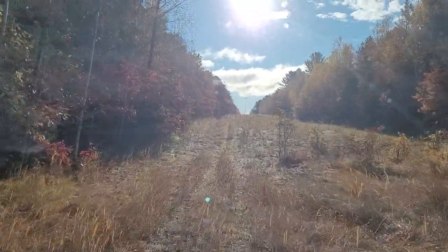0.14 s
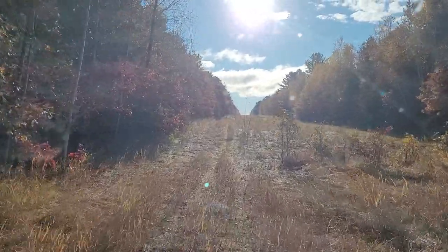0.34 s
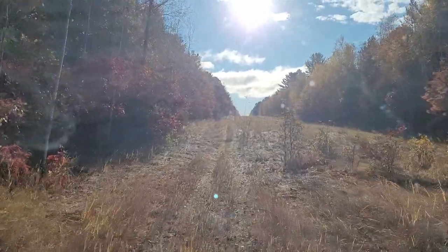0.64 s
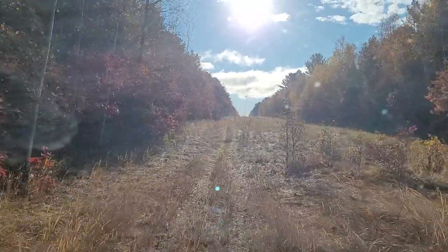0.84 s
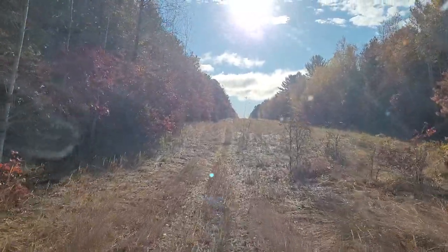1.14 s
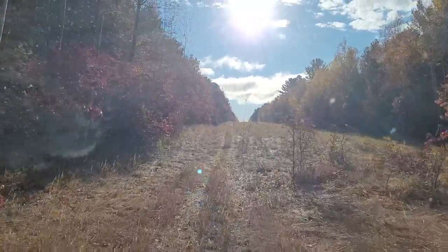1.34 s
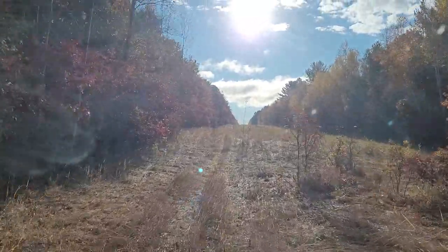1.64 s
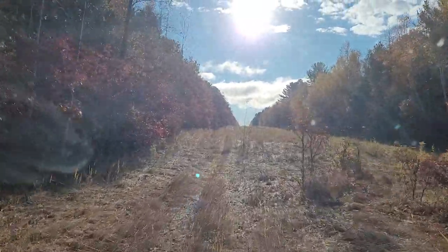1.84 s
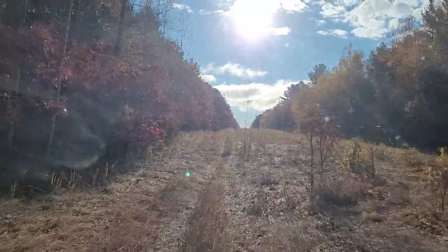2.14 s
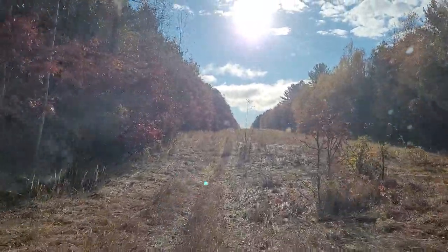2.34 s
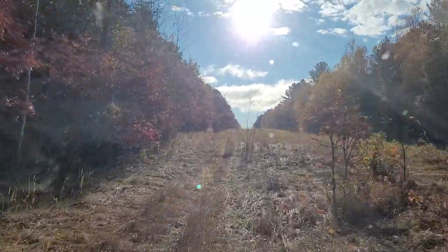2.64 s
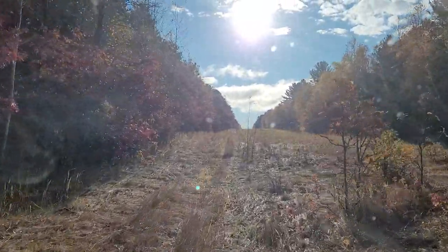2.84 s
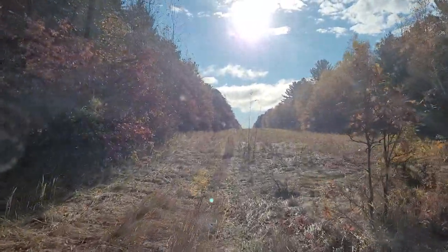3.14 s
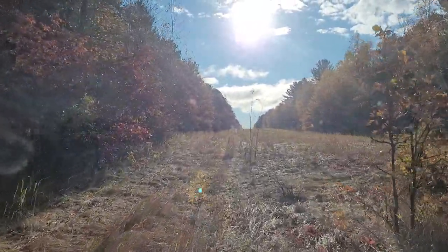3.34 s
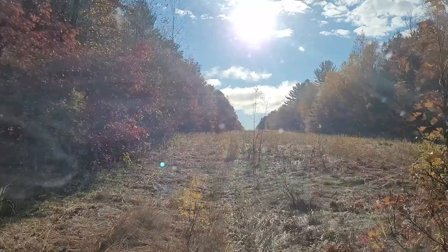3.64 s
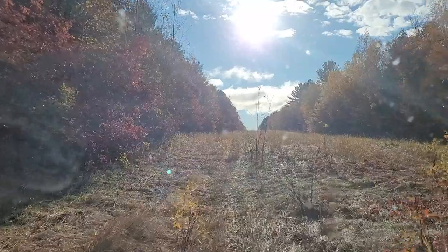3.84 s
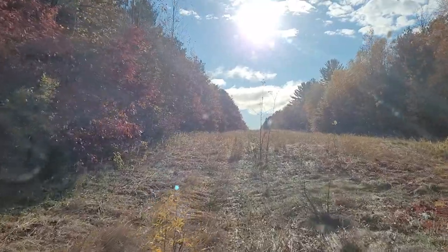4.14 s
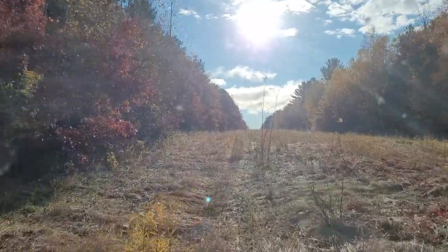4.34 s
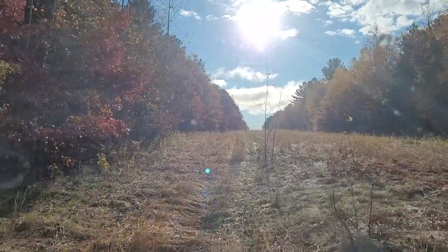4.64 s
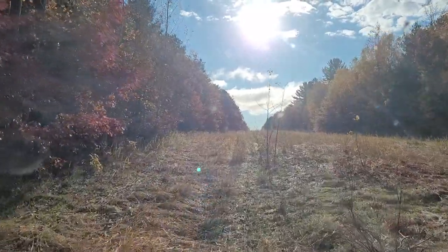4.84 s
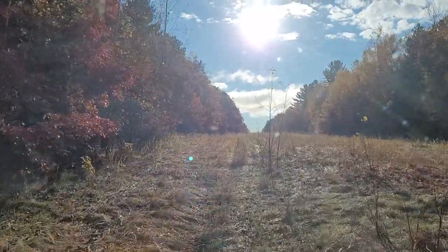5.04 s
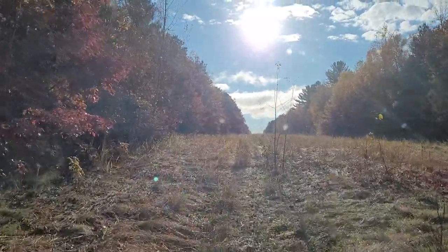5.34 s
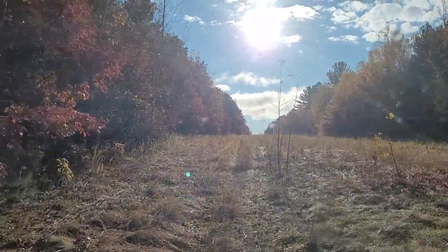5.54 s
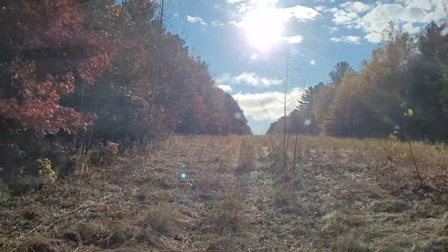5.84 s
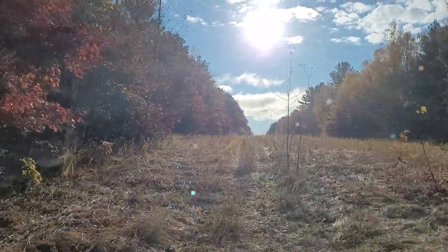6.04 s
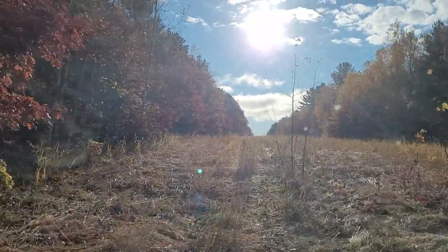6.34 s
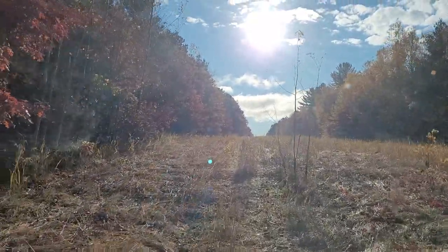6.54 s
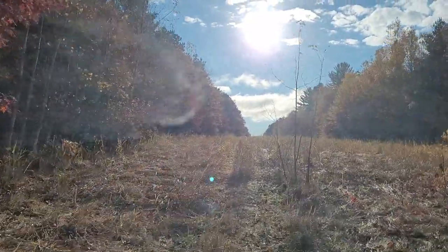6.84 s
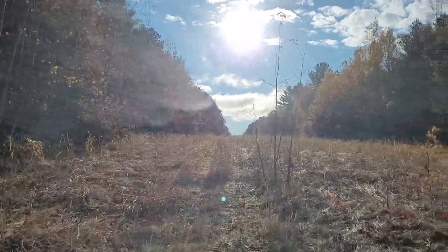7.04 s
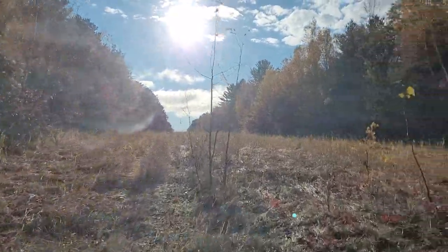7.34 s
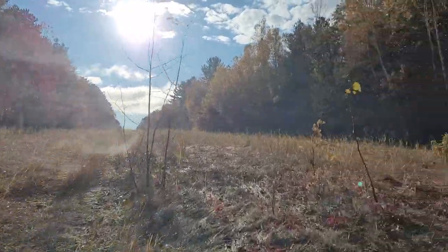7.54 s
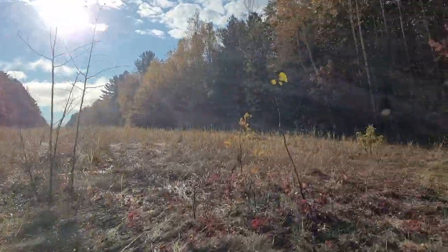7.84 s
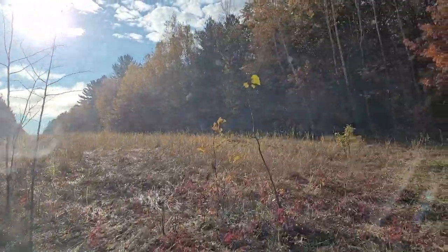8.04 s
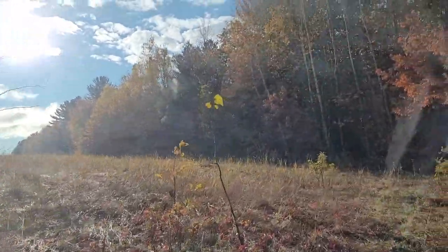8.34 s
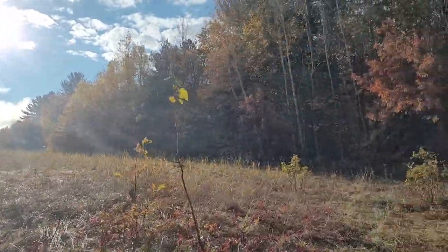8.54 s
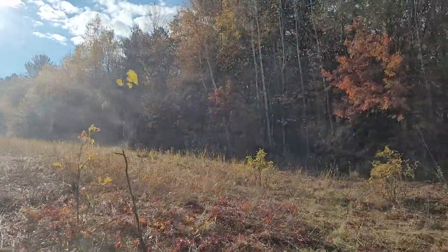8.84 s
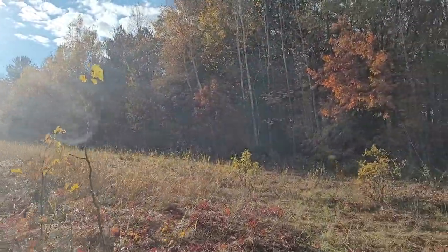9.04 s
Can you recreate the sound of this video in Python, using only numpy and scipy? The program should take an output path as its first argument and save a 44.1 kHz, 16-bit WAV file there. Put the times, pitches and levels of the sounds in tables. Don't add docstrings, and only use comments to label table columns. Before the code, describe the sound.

Low throbbing engine drone with tyre hum over tussocks, a sagging pitch near seven seconds, twig knocks, panel buzz and a renewed raspy pull.

```python
import sys
import numpy as np
from scipy import signal
from scipy.fft import rfft, irfft, next_fast_len
from scipy.io import wavfile
from scipy.ndimage import uniform_filter1d

SR = 44100
rng = np.random.default_rng(int(sys.argv[2]) if len(sys.argv) > 2 else 0)


def dump_mix(stems):
    frames = np.atleast_2d(stems).T
    limited = np.clip(frames, -1, 1)
    pcm = np.round(limited * 32767).astype(np.int16)
    wavfile.write(sys.argv[1], SR, pcm)


def rack_gain(trim_db):
    fader = np.asarray(trim_db, float)
    return 10 ** (fader / 20)


N = 405719


def curves(table):
    s, *columns = np.transpose(table)
    return [np.interp(np.arange(N) / SR, s, column) for column in columns]


def at(table, hz):
    table_hz, value = np.transpose(table)
    return np.interp(np.log(hz + 1), np.log(table_hz + 1), value)


def unit(x):
    return x / np.sqrt(np.mean(x ** 2))


def walk(rate):
    levels = np.resize(rng.standard_normal(400), int(N * rate / SR) + 2)
    glide = np.interp(np.arange(0, len(levels), .125), np.arange(len(levels)), levels)
    glide = uniform_filter1d(glide, size=5)
    return 1.3 * np.interp(np.arange(N) * (8 * rate / SR), np.arange(len(glide)), glide)


def swells(rows, width_s):
    t = np.arange(N) / SR
    return sum(db * np.exp(-((t - s) / width_s) ** 2) for s, db in rows)


def ring(x, hz, width_hz):
    return signal.lfilter(*signal.iirpeak(hz, hz / width_hz, SR), x)


# (time [s], cycle rate [Hz], throttle against cruising [dB])
ENGINE_RUN = [(0, 31.73, 0.5), (1.8, 31.58, 0.5), (3.3, 31.45, 2.5), (3.7, 30.42, -7), (4.7, 29.94, -4.5),
              (5.3, 29.29, -8.5), (6.76, 28.56, -5), (7.0, 26.25, -18.5), (7.25, 25.1, -20),
              (7.5, 24.43, -13.5), (7.78, 26.08, -6.5), (8.12, 24.0, -8.5), (8.3, 25.45, 0),
              (8.5, 27.88, 1.5), (8.8, 27.55, 4.5), (8.97, 25.59, -7.5), (9.1, 27.2, 4), (9.2, 28.06, 1)]
# (time [s], second firing against the first [dB], left minus right [dB])
FIRING_LOAD = [(0, -24, -1.7), (4, -22, -1.2), (6.8, -12, -1.1), (8.2, -8, -.5), (8.45, -3, -.6),
               (9.2, -4, -.9)]


def engine():
    hz, throttle_db = curves(ENGINE_RUN)
    hz = uniform_filter1d(hz, size=3000) + 0.053 * walk(5.)
    second_db, pan_db = curves(FIRING_LOAD)
    turns = np.cumsum(hz) / SR
    low = crank_boom(hz, turns, throttle_db, pan_db)
    rasp = exhaust(hz, turns, throttle_db, second_db)
    return low + rasp + intake_howl(hz, turns, throttle_db, second_db) + gear_whine(turns)


# (frequency [Hz], level [dB])
CAB_LOW_ORDERS = [(48, -18.5), (56, -16), (63, -25.5), (73, -17.5), (83, -26.5), (95, -31)]
# (frequency [Hz], level [dB])
CAB_FOURTH_ORDER = [(97, -17.5), (110, -16), (117, -17.5), (127, -21)]
# (time [s], gain [dB])
MOUNT_RUTS = [(.45, 6.5), (1.15, 0), (1.4, 1), (1.75, -5), (2.15, 6), (2.6, 0), (4.3, 6.5), (5.4, -4),
              (7.33, -6), (8.3, 0.5), (8.97, 5.5), (9.19, 2), (6.3, 2), (5.95, -7)]


def crank_boom(hz, turns, throttle_db, pan_db):
    def order_db(cab, order, wander):
        return at(cab, order * hz) + 0.2 * throttle_db + wander * 0.34 * walk(4.)

    crank_db = order_db(CAB_LOW_ORDERS, 2., 1.2) + swells(MOUNT_RUTS, 0.072) + 1.3 * walk(12.)
    third_db = order_db(CAB_LOW_ORDERS, 3., 1.1)
    fourth_db = order_db(CAB_FOURTH_ORDER, 4., .6) + 1.27 * walk(15.)
    boom_hz, boom_width_hz = 57, 3
    lag = 1.1 + np.arctan((2 * hz - boom_hz) / boom_width_hz)
    boom = rack_gain(crank_db) * np.cos(4 * np.pi * turns - lag)
    boom -= rack_gain(third_db) * (np.cos(6 * np.pi * turns) + rack_gain(-11.5) * np.cos(10 * np.pi * turns))
    boom += rack_gain(fourth_db) * np.cos(8 * np.pi * turns)
    boom *= np.sqrt(2)
    late = np.interp(np.arange(N) - 10, np.arange(N), boom)
    return np.array([late * rack_gain(pan_db / 2), boom * rack_gain(-pan_db / 2)])


# (frequency [Hz], width [Hz], one order at the centre [dB],
# share heard across the cab [-1 to 1], share of the load it follows [ratio])
EXHAUST_PIPES = [(160, 90, -42, -.1, .1), (262, 70, -40.5, -.2, .6), (335, 40, -49, .9, .3),
                 (410, 30, -43.5, -.3, .7), (443, 14, -50, -.3, 2), (472, 28, -43, -.3, .7),
                 (550, 70, -62, .5, .4)]


def exhaust(hz, turns, throttle_db, second_db):
    firing = np.flatnonzero(np.diff(np.floor(2 * turns)))
    pulses = np.zeros(N)
    pulses[firing] = rack_gain(.8 * rng.standard_normal(len(firing)))
    pulses[firing[1::2]] *= rack_gain(second_db[firing[1::2]])
    gas = .008 * np.exp(-(2 * turns % 1) / .4) * rng.standard_normal(N)
    drive = smear(pulses + gas) * SR / hz / np.sqrt(2)
    load_db = -37 + throttle_db + 0.64 * walk(5.) + 37.5
    rasp = 0
    for k, (f, width, db, across, follow) in enumerate(EXHAUST_PIPES):
        tone = ring(ring(drive, f, width), f, width)
        tone = (-1) ** k * rack_gain(db + follow * load_db) * tone
        rasp = rasp + tone * (1 + across * np.array([[1], [-1]]))
    return rasp


def smear(x):
    size = next_fast_len(N)
    hz = np.fft.rfftfreq(size, 1 / SR)
    phase = 2.4 * np.cos(2 * np.pi * hz / 150) + 1.5 * np.cos(2 * np.pi * hz / 83)
    return irfft(rfft(x, size) * np.exp(1j * phase), size)[:N]


def intake_howl(hz, turns, throttle_db, second_db):
    box_hz, box_width_hz, pulled_order = 712.4, 23, 25.1
    pull = np.clip(1.5 * rack_gain(2 * second_db), 0, 1)
    centre_hz = box_hz + pull * (pulled_order * hz - box_hz)
    level_db = -36.5 + 0.73 * throttle_db - 0.53 * (hz - 27.3) ** 2
    howl = 0
    for order in range(21, 32):
        inside = 1 / (1 + ((order * hz - centre_hz) / box_width_hz) ** 2)
        howl = howl + inside * np.cos(2 * np.pi * order * turns + .52 * order ** 2)
    return howl * rack_gain(level_db + 0.92 * walk(30.) + 1.2 * walk(15.)) * np.array([[.85], [1.15]])


# (time [s], half length [s], level [dB])
OVERRUN_WHINES = [
    (6.45, .4, -53),
    (7.95, .22, -50),
]


def gear_whine(turns):
    t = np.arange(N) / SR
    level = sum(rack_gain(db) * np.exp(-((t - s) / half_s) ** 2) for s, half_s, db in OVERRUN_WHINES)
    return level * rack_gain(1.5 * walk(25.)) * np.cos(2 * np.pi * 38 * turns)


# (time [s], tyre lug rate [Hz], ground roughness [dB])
TRAIL = [(0, 39.14, 1), (1, 38.5, 4), (3.1, 39.1, 1), (4.5, 37.45, 1), (5.4, 36, -1), (6.2, 31.93, -6.5),
         (6.6, 31.75, 2), (7.1, 36.7, -18), (9.2, 36.8, -13.5)]
# (time [s], hum gain [dB])
TUSSOCK_HITS = [
    (.55, 8),
    (1.05, 3),
    (1.75, 7),
    (2.7, 7),
    (3.42, 10.5),
    (4.2, 7.5),
    (4.9, 6),
    (6.0, 9.5),
]


def tread():
    hz, rough_db = curves(TRAIL)
    hum_db = -28.5 + rough_db + swells(TUSSOCK_HITS, 0.31)
    phase = 2 * np.pi * np.cumsum(hz + 0.56 * walk(3.8)) / SR
    hum = rack_gain(hum_db + 3.0 * walk(9.)) * (np.cos(phase) + rack_gain(-15.0) * np.cos(2 * phase))
    return np.sqrt(2) * np.array([np.roll(hum, 25), rack_gain(3.0) * hum])


# (time [s], swish peak level [dB], snap level [dB], knock level [dB])
STALK_TICKS = [(1.6322, -37, -53, -40), (2.0443, -39, -51, -40), (2.2079, -46, -49, -42),
               (3.049, -46, -39, -40), (3.714, -34, -51, -28), (5.246, -24, -31, -40),
               (5.365, -41, -47, -29), (5.507, -49, -51, -37), (8.1308, -45, -37, -46),
               (8.8808, -40, -28, -23)]
STALK_WHIPS = [(0.3444, -45, -56, -39), (1.3832, -42, -38, -28.5), (1.4024, -51, -43, -41),
               (4.8695, -41, -38, -30.5), (4.9398, -60, -60, -26), (5.244, -37, -32.5, -34),
               (6.075, -32.5, -35, -37), (6.6054, -63, -60, -30.5), (6.6344, -49, -41, -36),
               (7.417, -47, -36, -34), (7.44, -38, -40, -40), (7.4654, -57, -28.5, -29),
               (7.4894, -39, -55, -38), (7.9394, -51, -42, -41), (8.9219, -38, -46, -21.5),
               (9.0454, -36, -31, -26)]
STALK_BRUSHES = [(6.6695, -43, -38, -34.5), (7.8898, -42, -51, -52), (8.6, -40, -55, -59),
                 (8.6341, -36, -41, -46), (8.6695, -38, -39, -40), (8.7094, -38, -48, -37)]
# (frequency [Hz], width [Hz], level [dB])
DOOR_SKIN = [(716, 310, 3.5), (1070, 560, -0.5), (1520, 120, -2), (1970, 220, -1), (2330, 540, -6)]


def stalks():
    shape = np.zeros((3, N))
    kinds = ((STALK_TICKS, .007, .1), (STALK_WHIPS, .024, .32), (STALK_BRUSHES, .052, .35))
    for rows, length_s, attack in kinds:
        u = np.arange(int(2.8 * length_s * SR)) / (length_s * SR)
        env = np.minimum(u / attack, 1) * np.exp(-1.5 * np.maximum(u - attack, 0) ** 2)
        for s, swish_db, snap_db, knock_db in rows:
            i = int(s * SR)
            peaks = rack_gain(np.array([[swish_db - 8.5], [snap_db - 10.5], [knock_db - 6.5]]))
            shape[:, i:i + len(u)] += (peaks * env)[:, :N - i]
    roughness = rack_gain(1.6 * rng.standard_normal(N // 40 + 1).repeat(40)[:N])
    grain = rng.standard_normal((3, 2, N)) * roughness
    swish = signal.sosfilt(signal.butter(3, 10300, "high", fs=SR, output="sos"), grain[0])
    snap = signal.sosfilt(signal.butter(3, (3100, 7800), "band", fs=SR, output="sos"), grain[1])
    hits = shape[2] * grain[2]
    knock = sum(rack_gain(db + 23) * ring(hits, f, w) / np.sqrt(w / 10) for f, w, db in DOOR_SKIN)
    knock = rack_gain(1.5) * signal.sosfilt(signal.butter(3, 3600, fs=SR, output="sos"), knock)
    return shape[0] * unit(swish) + shape[1] * unit(snap) + knock


# (start [s], end [s], frequency [Hz], width [Hz], level [dB])
PANEL_BUZZES = [
    (2.4, 3.2, 1760, 40, -57),
    (6.65, 7.85, 2030, 70, -46),
    (8.2, 9.6, 1650, 150, -52),
    (-2, 11, 4690, 35, -66),
    (7.3, 8.7, 3900, 600, -53),
    (8.6, 8.78, 4900, 700, -50),
]


def panels():
    t, shake = np.arange(N) / SR, rng.standard_normal((2, N))
    out = 0
    for start, end, hz, width_hz, db in PANEL_BUZZES:
        swell = np.sqrt(np.clip(4 * (t - start) * (end - t), 0, None)) / (end - start)
        out = out + rack_gain(db) * swell * unit(ring(shake, hz, width_hz))
    return out


# (frequency [Hz], level per Hz [dB])
GROUND_RUMBLE = [(18, -31.5), (26, -9), (34, -13.5), (50, 1.5), (75, -5), (95, -10), (140, -7.5),
                 (200, -41)]
BODY_DRONE = [(90, -34.5), (150, 5), (220, -2), (300, -4), (370, -10), (450, -7.5), (600, -14), (720, -10),
              (900, -25.5), (1300, -43.5)]
BELT_FAN_GRASS_HISS = [(470, -39), (800, -1.5), (1050, -5.5), (1800, -5.5), (2200, -7), (2420, -11),
                       (2750, -9), (3890, -15), (4350, -16), (7620, -26), (8960, -36.5), (12100, -28),
                       (15700, -29.5)]


def rolling():
    rough_db = curves(TRAIL)[1]
    throttle_db = uniform_filter1d(curves(ENGINE_RUN)[1], size=12000)
    rumble = rack_gain(-27.5 + 0.13 * rough_db) * wash(GROUND_RUMBLE, 0.22, 3.0, 1.0, 0)
    drone_db = -31 + 0.061 * rough_db + 0.081 * throttle_db
    drone = rack_gain(drone_db) * wash(BODY_DRONE, 0.58, 23.0, 0.18, 2.6)
    hiss = rack_gain(-38.5 + 0.19 * throttle_db) * wash(BELT_FAN_GRASS_HISS, 0.62, 25., 0.31, 2.35)
    return rumble + drone + hiss


# (frequency [Hz], left-right correlation [-1 to 1])
STEREO_LIKENESS = [(60, 0.92), (130, 1), (290, 0.58), (640, 0.49), (1410, -0.31), (3100, 0.08),
                   (6820, -0.13), (15000, 0.078)]
# (frequency [Hz], left minus right [dB])
STEREO_SKEW = [(60, 6.5), (110, -2), (200, -2.5), (380, -5), (700, -1.5), (1290, -4.5), (2380, -5),
               (4400, 0), (8120, -1.5), (15000, -2)]


def wash(spectrum, flicker_db, flicker_rate, swell_db, ripple_db):
    size = next_fast_len(N)
    hz = np.fft.rfftfreq(size, 1 / SR)
    alike = np.clip(at(STEREO_LIKENESS, hz), -1, 1)
    mid, side = rfft(rng.standard_normal((2, size))) * np.sqrt([1 + alike, 1 - alike])
    skew = rack_gain(at(STEREO_SKEW, hz) / 2)
    pair = np.array([(mid + side) * skew, (mid - side) / skew]) * rack_gain(at(spectrum, hz))
    ripple = uniform_filter1d(uniform_filter1d(rng.standard_normal(pair.shape), size=300), size=300)
    pair = pair * rack_gain(ripple_db * unit(ripple))
    swell = .4 * walk(3.) + walk(20.)
    lowest, highest = np.floor(np.log2(spectrum[0][0])), np.log2(spectrum[-1][0])
    out = 0
    for octave in np.arange(lowest, highest + 1):
        share = np.cos(np.pi / 2 * np.clip(np.log2(hz + 1) - octave, -1, 1)) ** 2
        band = irfft(pair * share, size)[:, :N]
        out = out + band * rack_gain(swell_db * swell + flicker_db * walk(flicker_rate))
    return unit(out)


def scene():
    return engine() + tread() + stalks() + panels() + rolling()


def band_limit(x):
    return signal.sosfilt(signal.butter(12, 16660, fs=SR, output="sos"), x)


def record(dry):
    limit = 1.46
    mix = limit * np.tanh(dry / limit)
    mix = signal.sosfilt(signal.butter(2, 22, "high", fs=SR, output="sos"), mix)
    mix = signal.sosfilt(signal.ellip(14, .3, 90, 15800, fs=SR, output="sos"), mix)
    return band_limit(mix)


dry = scene()
out = record(dry)
dump_mix(out)
```